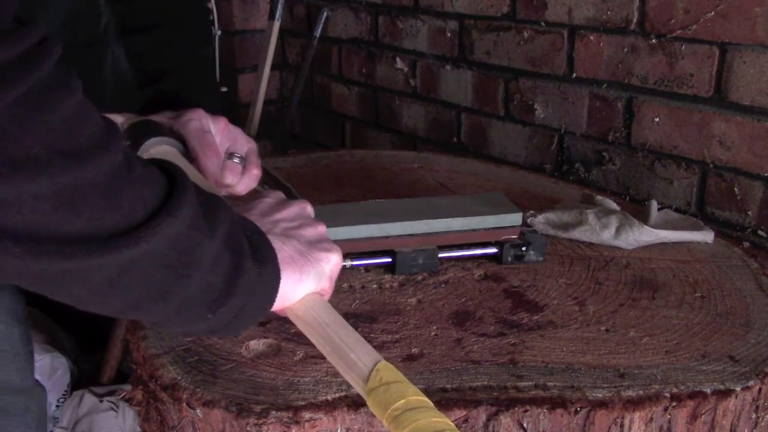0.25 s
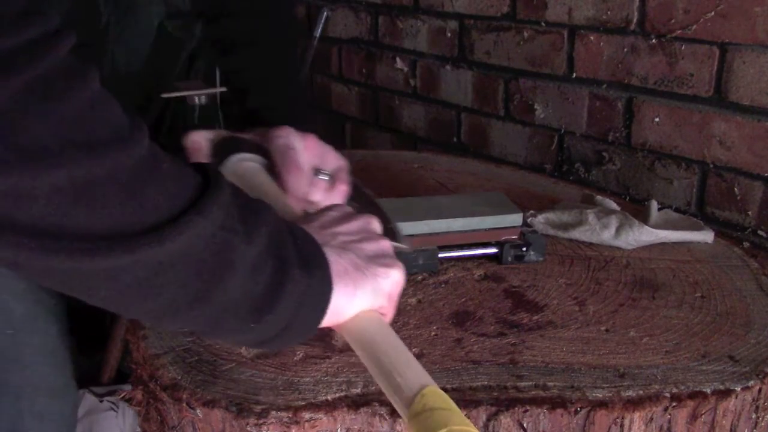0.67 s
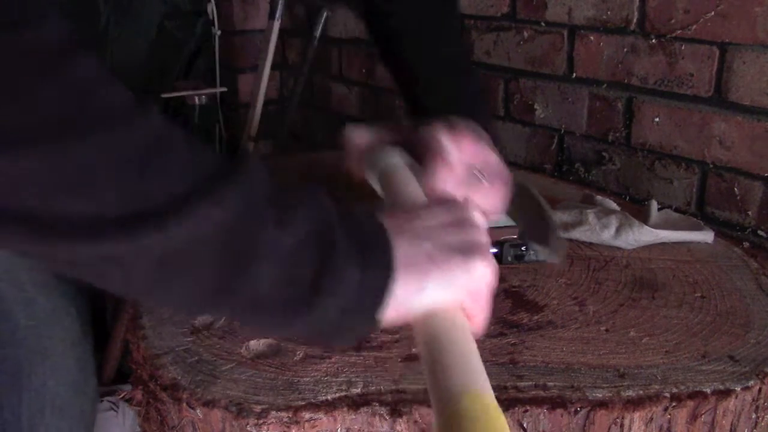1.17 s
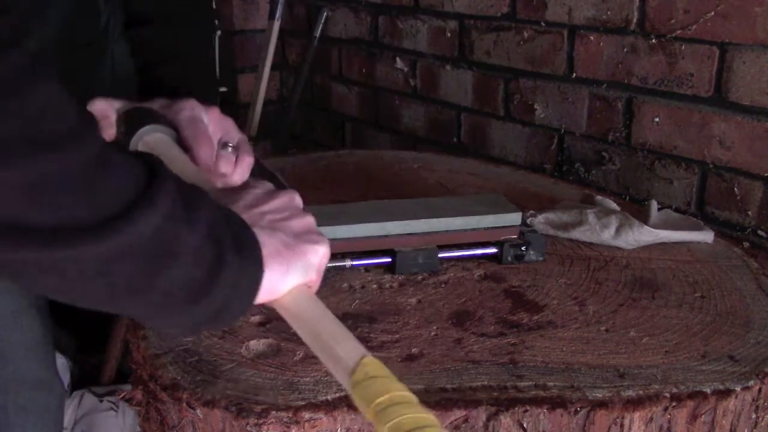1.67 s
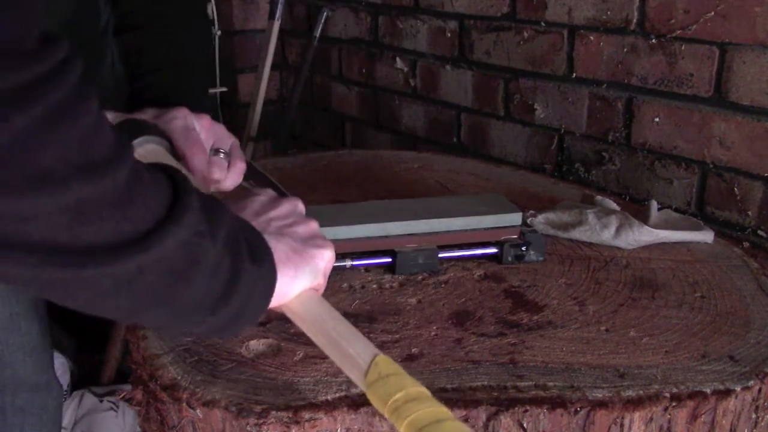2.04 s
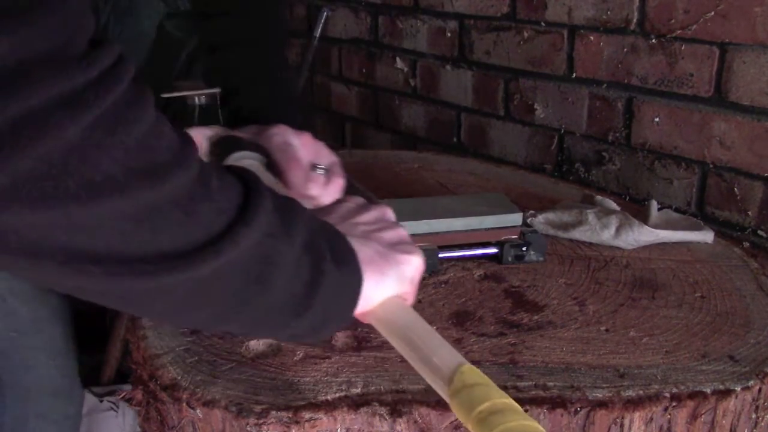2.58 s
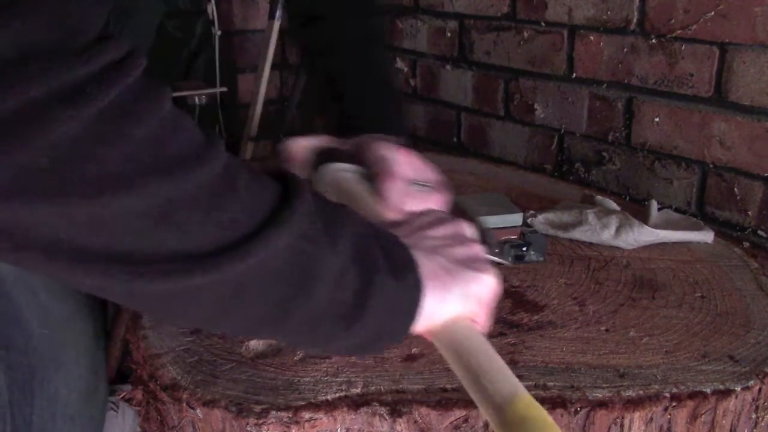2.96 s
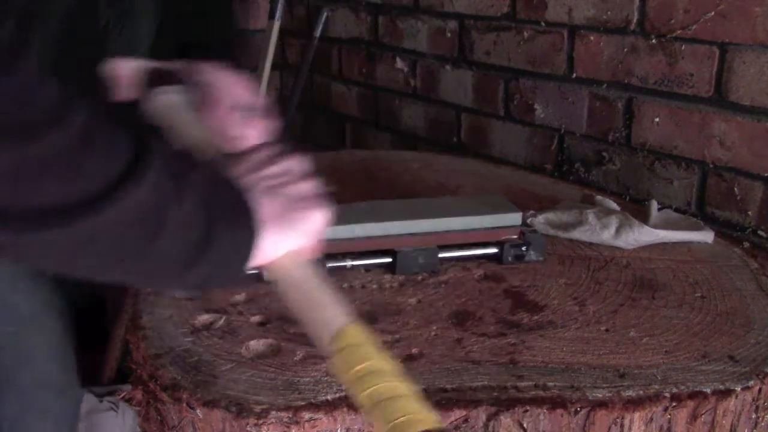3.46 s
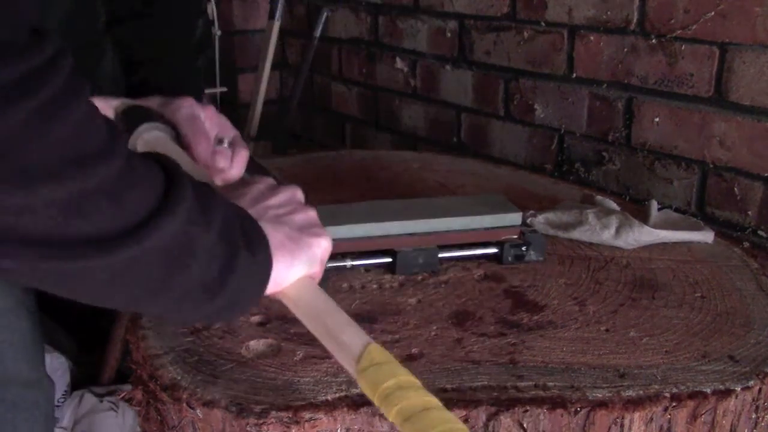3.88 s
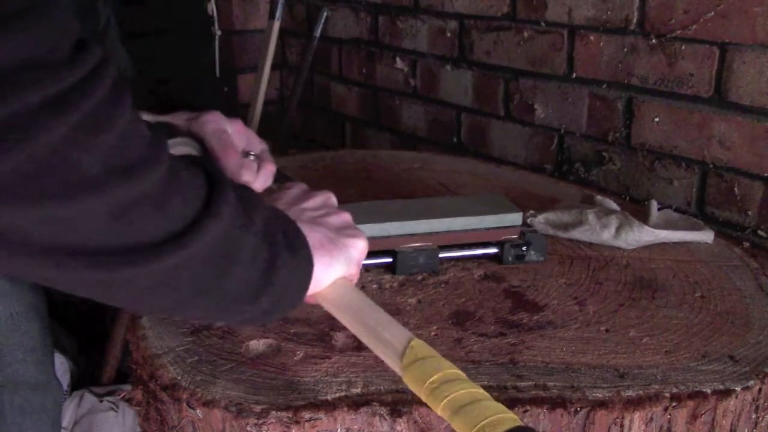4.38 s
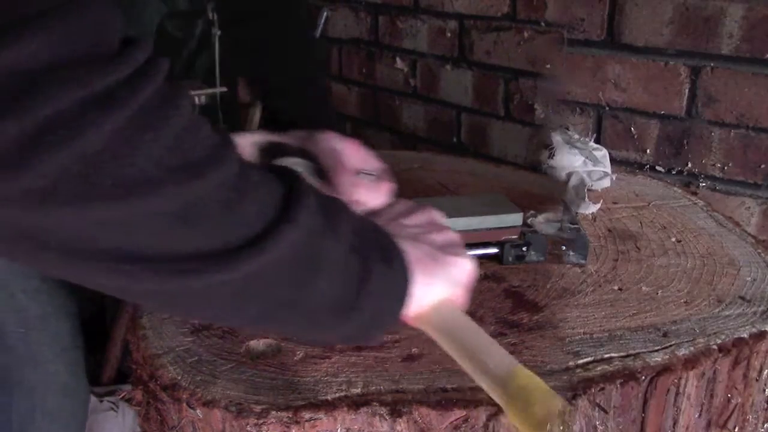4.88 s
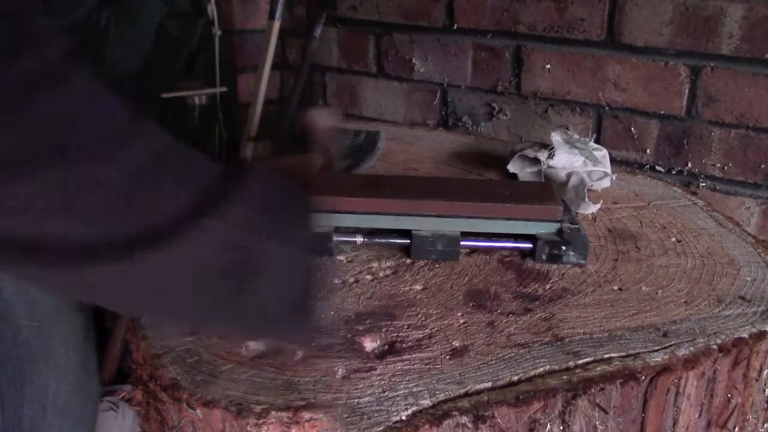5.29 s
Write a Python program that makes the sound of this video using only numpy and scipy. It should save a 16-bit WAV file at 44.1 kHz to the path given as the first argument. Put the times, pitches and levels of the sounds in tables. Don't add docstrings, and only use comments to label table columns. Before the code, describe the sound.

A steady, low, soft traffic rumble lies far behind throughout. Close and central, an axe edge is already starting along a wet stone at 0 s: faint uneven touches, then from 0.15 s a gritty, hissing scrape with steely tones that slide and arch upward, swelling to about 0.98 s. The stone rocks with a soft low thud, and the lifted blade gives a small, quickly fading ring. After a pause, bright light clicks and skips come at 1.68-1.77 s, with fainter scuffs at 1.9-1.98 s. The second push rasps from 2.0 to 3.0 s, ending in a brighter knock and the clearest ring. Quiet again until a hard double clack at 3.83 s and small taps at 3.91-3.95 s. The third push starts hesitantly, dips near 4.3 s, then strengthens until 5.04 s, ending in a knock and gentle ring. Short brick-wall echoes; then only traffic until about 5.6 s.

```python
import sys
import numpy as np
from scipy import signal
from scipy.fft import rfft, irfft, next_fast_len
from scipy.io import wavfile
from scipy.ndimage import uniform_filter1d

SR = 44100
rng = np.random.default_rng(int(sys.argv[2]) if len(sys.argv) > 2 else 0)


def unload_audio(sound):
    columns = np.transpose(np.atleast_2d(sound))
    steps = np.round(np.clip(columns, -1, 1) * 32767)
    wavfile.write(sys.argv[1], SR, steps.astype(np.int16))


def convert_level_to_amplitude(level_db):
    exponent = np.asarray(level_db, float) / 20
    return 10 ** exponent


N = 243981

STATIONS = [0, .36, .73, 1]
# heel_s, belly_s, roll_over_s, toe_s [s]
PUSHES = [
    (-.08, .33, .68, .98),
    (1.9, 2.3, 2.7, 3.0),
    (3.9, 4.5, 4.8, 5.03),
]
FREE_HZ = [2988, 4000, 5150, 5292, 5562, 7630, 7985, 11192, 14840]
# pitch_hz [Hz], level_db [dB per Hz]
STONE = [(180, -55), (300, -8), (940, -5.5), (1700, 3), (2750, 3), (3470, 6), (4830, 1.5), (5340, -4.5),
         (6960, -4), (7940, 1), (8770, -3.5), (11400, -14.5), (12600, -22), (15600, -23)]


def evened(x):
    return x / np.sqrt(np.mean(x ** 2) + 1e-20)


def read(points, hz):
    f, value = np.transpose(points)
    return np.interp(np.log(hz + 1), np.log(f + 1), value)


def coloured(x, points):
    size = next_fast_len(len(x))
    gain = convert_level_to_amplitude(read(points, np.fft.rfftfreq(size, 1 / SR)))
    return irfft(rfft(x, size) * gain, size)[:len(x)]


def resonate(x, hz, width):
    r, turn = np.exp(-np.pi * width / SR), 2 * np.pi * hz / SR
    gain = np.sqrt(1 - r * r)
    return signal.lfilter([gain, 0, -gain], [1, -2 * r * np.cos(turn), r * r], x) / np.sqrt(2)


def peak(hz, centre_hz, width):
    return np.sqrt(SR / width) / (1 + 1j * (hz[:, None] - centre_hz) / (.65 * width)) ** 2


def drift(t, per_s, count):
    return [np.interp(t * per_s, np.arange(400), knots) for knots in rng.standard_normal((count, 400))]


def traffic():
    # pitch_hz [Hz], level_db [dB per Hz]
    rumble = [(15, -74), (25, -49), (59, -18), (140, -5), (169, -9), (194, -4.5), (240, -3), (332, -9),
              (370, -10), (459, -9), (808, -11), (1420, -19.5), (2940, -34.5), (5780, -38), (15600, -50.5)]
    # pitch_hz [Hz], likeness [0-1]
    alike = [(60, .96), (240, .97), (1000, .97), (2800, .95), (3800, 1), (15000, 1)]
    # pitch_hz [Hz], difference_db [dB]
    sideways = [(60, 1.2), (500, .9), (1500, .3), (3500, 0), (15000, 0)]
    frames, hz = N // 512 + 5, np.fft.rfftfreq(2048, 1 / SR)
    a, b, c, d, patches = rng.standard_normal((frames, 1025, 5)).T
    patches = evened(uniform_filter1d(uniform_filter1d(patches, size=8, axis=0), size=10, axis=1))
    same = np.clip(read(alike, hz), -1, 1)[:, None]
    lean = convert_level_to_amplitude(read(sideways, hz) / 2)[:, None]
    left = a + 1j * b
    right = same * left + np.sqrt(1 - same ** 2) * (c + 1j * d)
    z = np.array([left * lean, right / lean])
    z *= convert_level_to_amplitude(read(rumble, hz)[:, None] + 2.2 * patches)
    return convert_level_to_amplitude(-43) * evened(signal.istft(z, nperseg=2048, noverlap=1536)[1][:, :N])


def wall(x, t60, unlike):
    t = np.arange(9000) / SR
    sign = rng.choice([-1., 1.], (2, len(t)))
    taps = sign * (rng.random((2, len(t))) < .05) * convert_level_to_amplitude(-60 * t / t60) * (t > .003)
    side = signal.lfilter([0.79, 1.15, -0.068, -0.94, 0.3], 4, taps[1])
    tail = taps[0] + unlike * side * np.array([[1], [-1]])
    return signal.fftconvolve(x[None], tail / np.linalg.norm(taps[0]), axes=1)[:, :N]


def thuds():
    # start_s [s], level_db [peak dB], pitch_hz [Hz]
    rocks = [
        (0.94, -41, 208),
        (2.945, -32.5, 640),
        (5.012, -32.5, 423),
    ]
    t, out = np.arange(N) / SR, np.zeros(N)
    for s, db, hz in rocks:
        shake = np.exp(-((t - s - .015) / 0.027) ** 2) * rng.standard_normal(N)
        out += convert_level_to_amplitude(db - 10) * (resonate(shake, hz, 110) + resonate(shake, 230, 140.6))
    return out


def singing():
    # fade_s [s to fall 60 dB], level_db [dB]
    dying = [(.9, -46), (.11, -40), (.16, -38), (.2, -44), (.5, -65), (.14, -48), (.15, -49), (.15, -34),
             (.12, -56)]
    lifts_db = [
        -7,
        3,
        -6,
    ]
    lift_s = .015
    u, out = np.arange(-.02, .5, 1 / SR), np.zeros(N + SR)
    grip_db = 200 * np.maximum(u - .22, 0)
    for hz, (t60, db) in zip(FREE_HZ, dying):
        for push, lift_db in zip(PUSHES, lifts_db):
            start = round((push[-1] + lift_s + u[0]) * SR)
            level_db = db + lift_db + 3 - 60 * np.maximum(u, 0) / t60 - grip_db
            level = convert_level_to_amplitude(level_db) * np.minimum(u / .02 + 1, 1)
            out[start:start + len(u)] += level * np.sin(2 * np.pi * (hz * u + rng.random()))
    return out[:N]


def grit(size_db, per_s):
    size = convert_level_to_amplitude(size_db * np.minimum(rng.exponential(1, N), 5))
    grains = size * (rng.random(N) < per_s / SR) * rng.standard_normal(N)
    clumps = convert_level_to_amplitude(0.5 * evened(uniform_filter1d(rng.standard_normal(N), size=120)))
    return evened(grains * clumps)


def landings(sand, rows, peaks, blow_s):
    t, drive = np.arange(N) / SR, np.zeros(N)
    for s, db, t60, blow_db in rows:
        u = np.maximum(t - s, 0)
        scuff = convert_level_to_amplitude(np.maximum(db - 12.5 - 60 * u / max(t60, .02), -150))
        drive += scuff * (1 - np.exp(-u / 0.00097)) * sand
        drive -= convert_level_to_amplitude(db + blow_db + 7) * np.exp(-((t - s - .0002) / blow_s) ** 2)
    steel = sum(convert_level_to_amplitude(db - 10.0) * resonate(drive, hz, width + 20) for hz, width, db in peaks)
    return steel + convert_level_to_amplitude(-3) * coloured(drive, STONE)


def skips(sand):
    # start_s [s], level_db [peak dB], fade_s [s to fall 60 dB], blow_db [dB]
    touches = [
        (1.6819, -17, 0.093, -7),
        (1.7038, -23.5, .15, -2),
        (1.758, -21, .2, -5),
        (1.765, -20, 0.17, -4),
        (1.772, -20.5, 0.038, -23),
        (1.901, -27.5, 0.17, -21),
        (1.9286, -28.5, 0.42, -22),
        (1.9754, -22, .15, -30),
        (3.906, -28, 0.22, -17),
        (3.949, -20, 0.044, -20),
    ]
    # pitch_hz [Hz], width_hz [Hz], level_db [dB]
    held = [(1530, 68, -8.5), (1980, 60, -11.5), (3280, 50, -4.5), (3870, 90, -6), (4230, 30, 0),
            (5300, 60, -3), (5880, 65, -11), (7500, 80, -8.5), (7960, 41, -2), (9260, 74, -18.5),
            (9400, 110, -13), (10960, 35, -7), (12350, 59, -19), (14000, 60, -20)]
    return landings(sand, touches, held, blow_s=.00005)


def knocks(sand):
    # start_s [s], level_db [peak dB], fade_s [s to fall 60 dB], blow_db [dB]
    blows = [
        (3.8290, -18.5, 0.065, -6.5),
        (3.8329, -22.5, .11, 4),
    ]
    # pitch_hz [Hz], width_hz [Hz], level_db [dB]
    struck = [(755, 98, -8), (1100, 72, -5), (1950, 99, 0), (3020, 110, -22.5), (3720, 360, 6),
              (5500, 160, 1), (6150, 83, -1.5), (7900, 91, 1.5), (9200, 240, -20), (10100, 130, -41),
              (11200, 140, -33), (13100, 86, -27)]
    return landings(sand, blows, struck, blow_s=.00009)


def contact(t):
    # time_s [s], pressure_db [dB]
    strokes = [
        [(0.0, -30), (0.026, -35.5), (0.06, -26), (0.12, -42), (0.15, -27.5), (0.206, -23.5), (0.71, -25),
         (0.956, -19), (0.99, -32.5)],
        [(2.0, -34), (2.016, -43.5), (2.052, -28), (2.13, -21.5), (2.512, -27), (2.732, -22), (2.772, -25.5),
         (3.0, -19), (3.016, -30.5)],
        [(3.96, -39), (4.088, -25), (4.264, -29.5), (4.318, -38.5), (4.408, -26), (4.816, -20.5),
         (4.852, -26.5), (5.024, -21), (5.045, -32.5)],
    ]
    force = 0
    for rows in strokes:
        touching = (t >= rows[0][0]) * (t < rows[-1][0])
        force = force + convert_level_to_amplitude(np.interp(t, *np.transpose(rows))) * touching
    pressure_db = np.interp(t, *np.transpose(np.vstack(strokes)))
    return force * convert_level_to_amplitude(4.5), 3 - 0.05 * (pressure_db + 27.5)


def travel(t):
    push = sum(t > (a[-1] + b[0]) / 2 for a, b in zip(PUSHES, PUSHES[1:]))
    return np.choose(push, [np.interp(t, row, STATIONS) for row in PUSHES]), push


def loaded_steel(hz, t, place, fine_db):
    # width_hz [Hz], then heel_hz, belly_hz, roll_over_hz, toe_hz [Hz]
    tones = [(90, 1140, 1140, 1150, 1150), (200, 2050, 2050, 2000, 1970), (280, 3800, 3850, 3780, 4120),
             (200, 4400, 4420, 5850, 6200), (120, 5480, 5230, 5100, 5200), (450, 6600, 6800, 6300, 6000),
             (400, 7600, 7450, 7300, 7600), (260, 8050, 7950, 8150, 8300), (300, 9300, 9000, 9500, 8950),
             (450, 10300, 10100, 10100, 10350), (280, 11300, 11450, 11400, 11500),
             (750, 13900, 13000, 13100, 12700), (800, 14600, 15000, 14900, 14700)]
    # heel_db, belly_db, roll_over_db, toe_db [dB]
    tones_db = [(-3, -3, -20, -4.5), (-5.5, -27, -29, 2.5), (-15, .4, 1, -3.5), (4, -5.5, 0, -22.5),
                (1.2, -33, -28, -1), (-5, -5.5, -8, -11.5), (-2.5, -11, -16, -8), (-2.5, -5.5, -3.5, -2.5),
                (-34, -12, -12.5, -7.5), (-3, -9.5, -10, -6), (-14, -9.5, -31, -0.5),
                (-11.5, -17.5, -12.5, -20), (-24, -21, -19.5, -16.5)]
    steel = 0
    chances = drift(t, per_s=16, count=len(tones))
    for k, ((width, *f), db, chance) in enumerate(zip(tones, tones_db, chances)):
        share_db = fine_db if k > 4 else 0
        gain = np.interp(place, STATIONS, convert_level_to_amplitude(np.array(db))) * convert_level_to_amplitude(share_db + 1.8 * chance - 20.5)
        opposite = (-1) ** k
        steel = steel + gain * opposite * peak(hz, np.interp(place, STATIONS, f), width)
    return steel


def rolling_steel(hz, t, place, push):
    # rest_hz [Hz], rise_place, top_place, back_place [0-1]
    arches = [(1480, .38, .73, 1), (3050, .58, .84, .95), (5120, .8, .92, 1.08)]
    # rest_db, top_db, after_db [dB]
    arches_db = [(-10, 1.5, 2.5), (-4, 4, 4), (-7, 4, -8)]
    # low_hz, middle_hz, high_hz [Hz]
    tops = [(2100, 3450, 5750), (2330, 3650, 5650), (2350, 3620, 5600)]
    steel = 0
    chances = drift(t, per_s=21, count=len(arches))
    for (rest_hz, *at), db, tops_hz, chance in zip(arches, arches_db, np.transpose(tops), chances):
        f = rest_hz + (tops_hz[push] - rest_hz) * np.interp(place, at, [0, 1, 0])
        gain = np.interp(place, at, convert_level_to_amplitude(np.array(db))) * convert_level_to_amplitude(1.3 * chance - 17.5)
        steel = steel + 1j * gain * peak(hz, f + 20 * chance[::-1], width=190)
    return steel


def still_lines(hz, place):
    # pitch_hz [Hz], width_hz [Hz], place [0-1], span [0-1], level_db [dB]
    hollows = [(4700, 520, .72, .1, -10), (2550, 300, .89, .07, -8), (6700, 550, .58, .11, -6),
               (9000, 600, .15, .15, -6), (1250, 250, .75, .1, -6)]
    return sum(db * np.exp(-((hz[:, None] - f) / width) ** 2 - ((place - at) / span) ** 2)
               for f, width, at, span, db in hollows)


def narrow_rings(drive):
    # width_hz [Hz], then heel_db, one_third_db, two_thirds_db, toe_db [dB]
    shaken = [(29.9, -34, -6, -20.5, -28.5), (49.2, -10, -13, -54, -5), (40, -24, -44, -24.5, -4),
              (40, -9, -17, -49, -6), (40, -31, -32, -13, -23), (49.3, -13.5, -12, -35, -16.5),
              (71, -17, -19.5, -17.5, -22.5), (59.6, -24, -11, -17.5, -4), (60.1, -25.5, -38.5, -29, -25.5)]
    t, out = np.arange(N) / SR, np.zeros(N)
    place = travel(t)[0]
    for f, (width, *db), chance in zip(FREE_HZ, shaken, drift(t, per_s=9, count=len(FREE_HZ))):
        level_db = np.interp(place, np.linspace(0, 1, len(db)), db) - 10.5 + 2.5 * chance
        out += resonate(drive * convert_level_to_amplitude(level_db), f, width)
    return out


def blade(sand):
    t = np.arange(N) / SR
    force = contact(t)[0] * convert_level_to_amplitude(0.26 * drift(t, per_s=20, count=1)[0])
    frame = dict(fs=SR, nperseg=512, noverlap=384)
    hz, t, z = signal.stft(force * sand, **frame)
    fine_db, (place, push) = contact(t)[1], travel(t)
    hiss = signal.stft(force * sand[::-1], **frame)[2]
    hiss = hiss * convert_level_to_amplitude(-8.5 + read(STONE, hz)[:, None] + .5 * fine_db)
    steel = loaded_steel(hz, t, place, fine_db) + rolling_steel(hz, t, place, push)
    mottle = uniform_filter1d(rng.standard_normal(z.shape), size=5, axis=0)
    mottle = evened(uniform_filter1d(mottle, size=26, axis=1))
    z = (z * steel + hiss) * convert_level_to_amplitude(2.46 * mottle + still_lines(hz, place))
    return signal.istft(z, **frame)[1][:N] + narrow_rings(force * sand)


def scene():
    sand = grit(size_db=0.5, per_s=18000)
    near = blade(sand) + skips(sand) + knocks(sand) + thuds()
    return near + singing() + convert_level_to_amplitude(-8) * wall(near, t60=0.17, unlike=0.2) + traffic()


def roll_off(x):
    return signal.sosfilt(signal.butter(12, 15800, fs=SR, output="sos"), x)


def record(dry):
    x = signal.sosfilt(signal.butter(2, 50, "high", fs=SR, output="sos"), dry)
    treble_limit = signal.firwin(511, 15750, window=("kaiser", 7), fs=SR)
    x = signal.oaconvolve(x, treble_limit[None], "same")
    return roll_off(x)


dry = scene()
out = record(dry)
unload_audio(out)
```